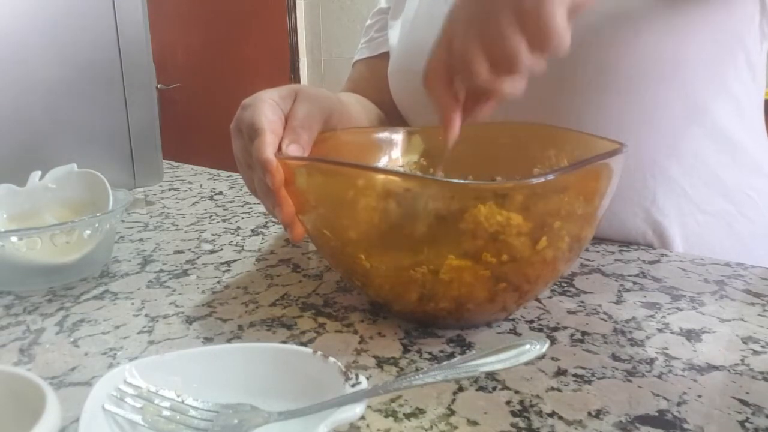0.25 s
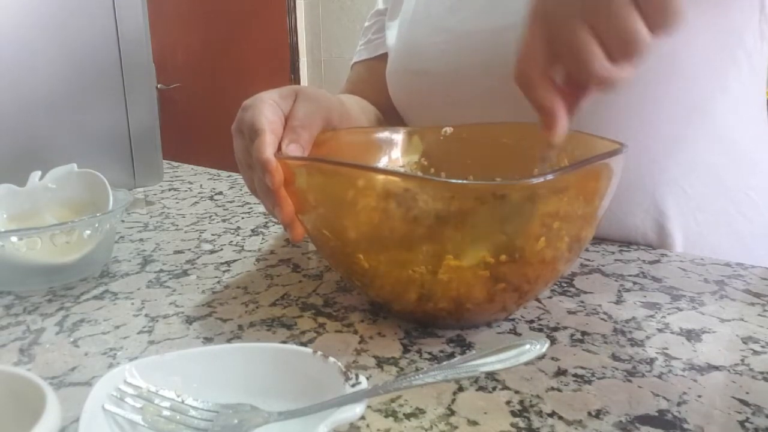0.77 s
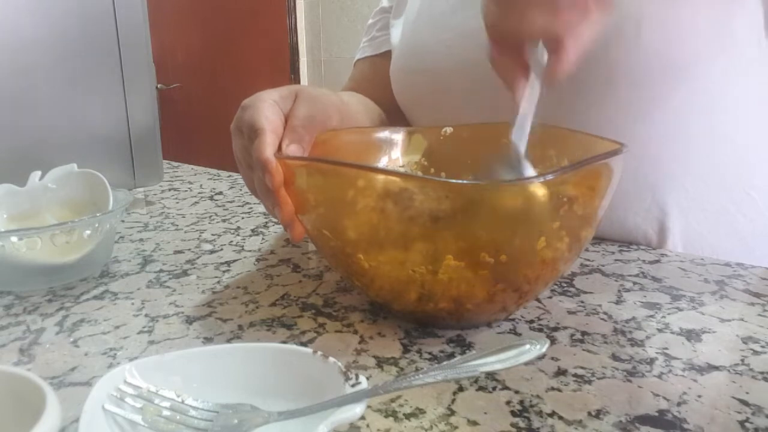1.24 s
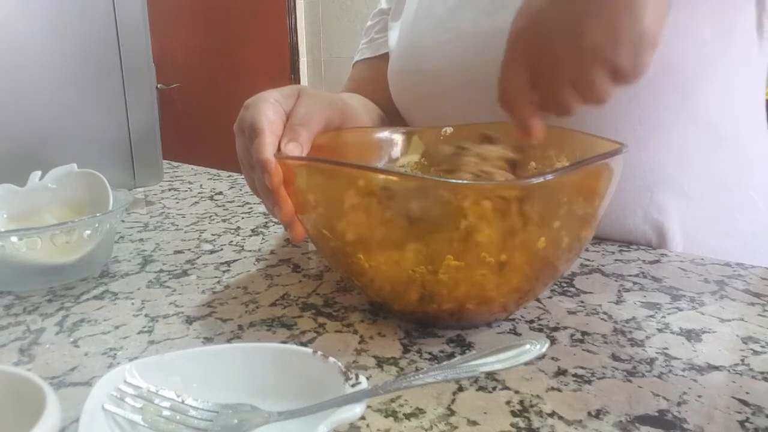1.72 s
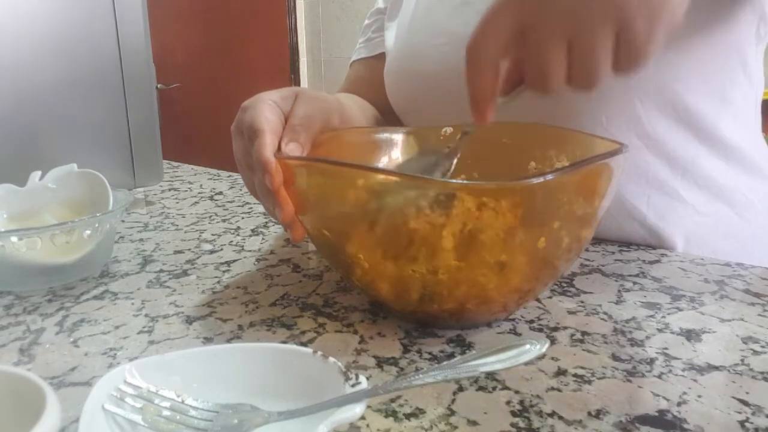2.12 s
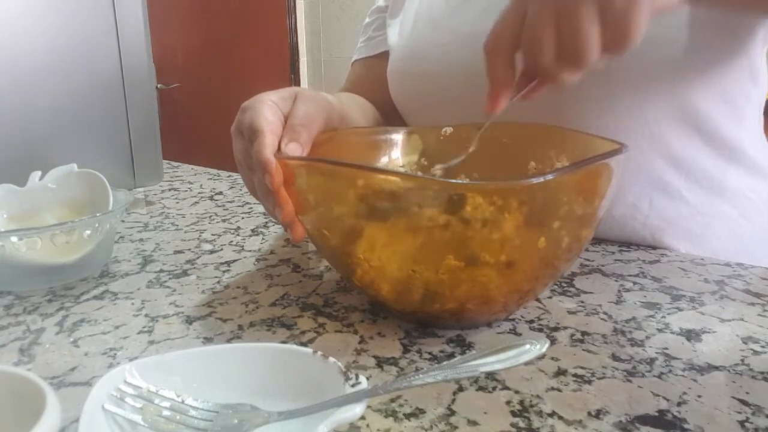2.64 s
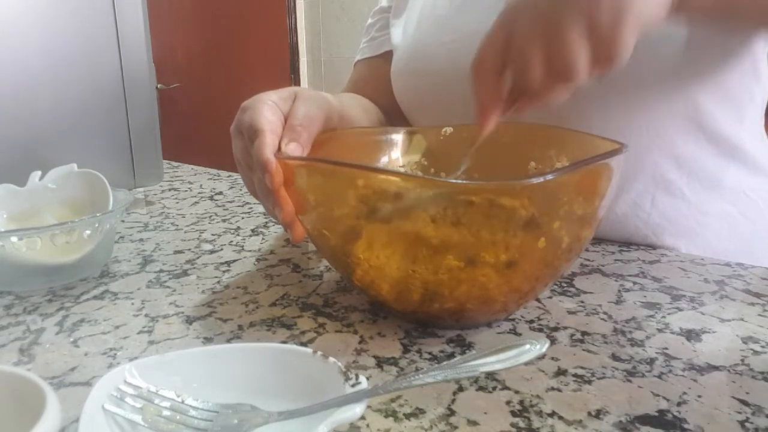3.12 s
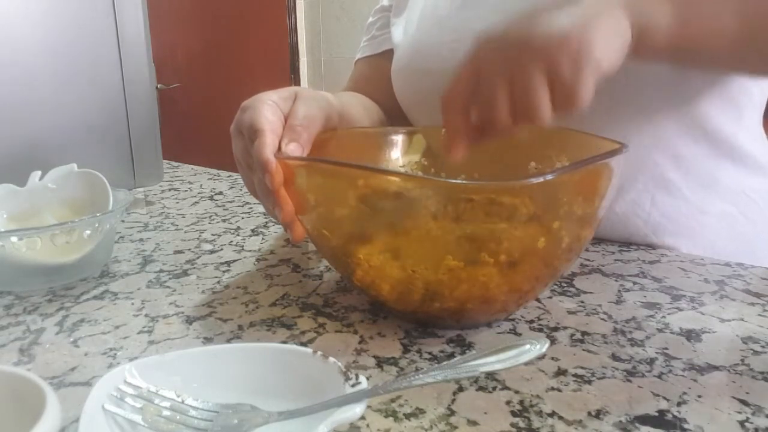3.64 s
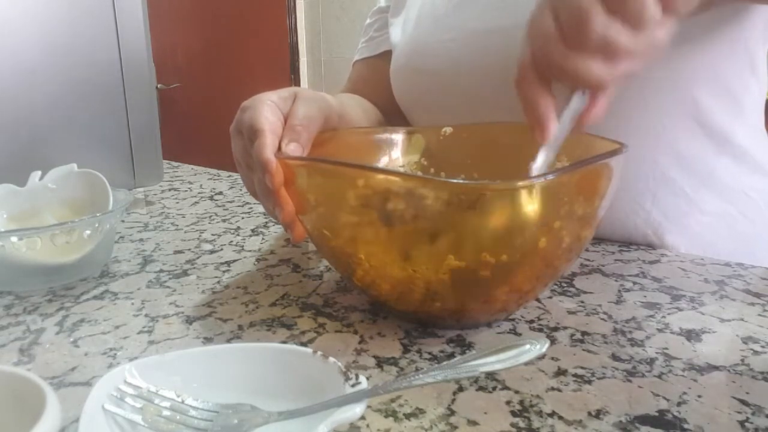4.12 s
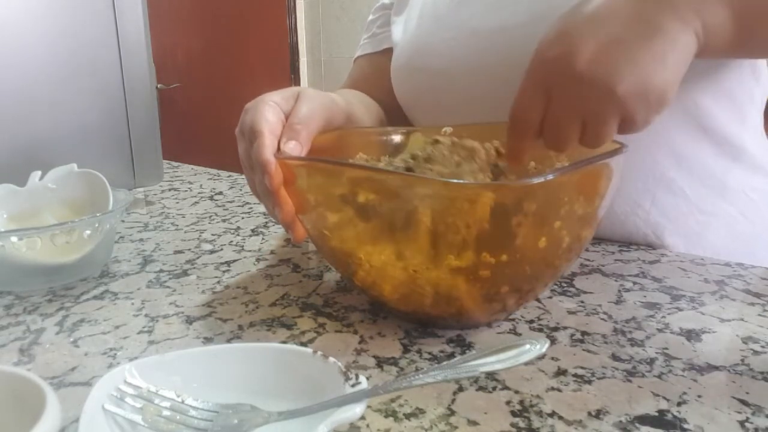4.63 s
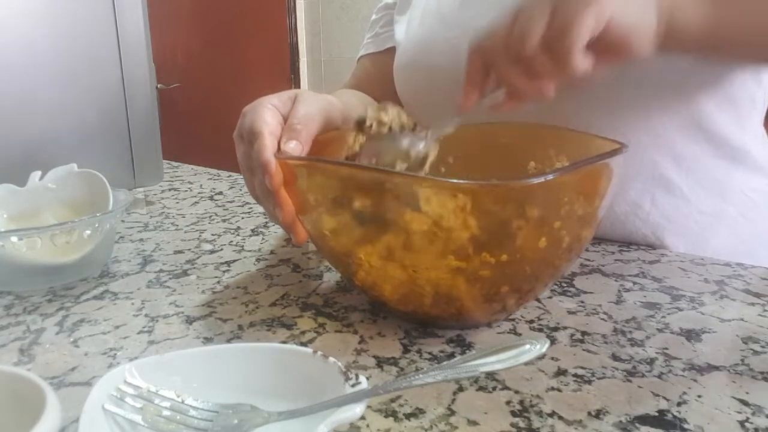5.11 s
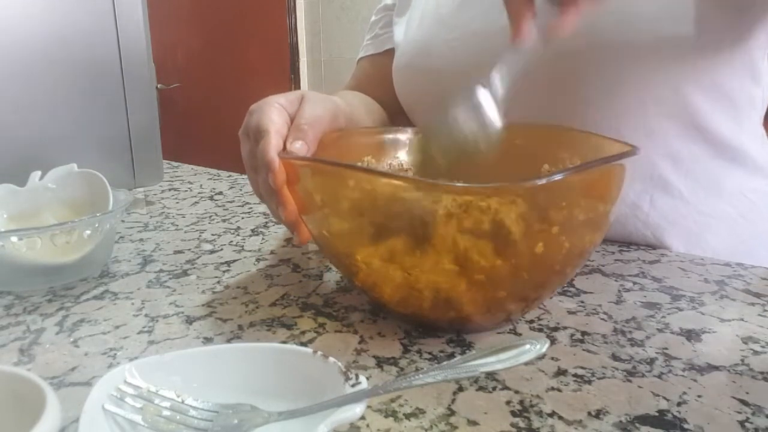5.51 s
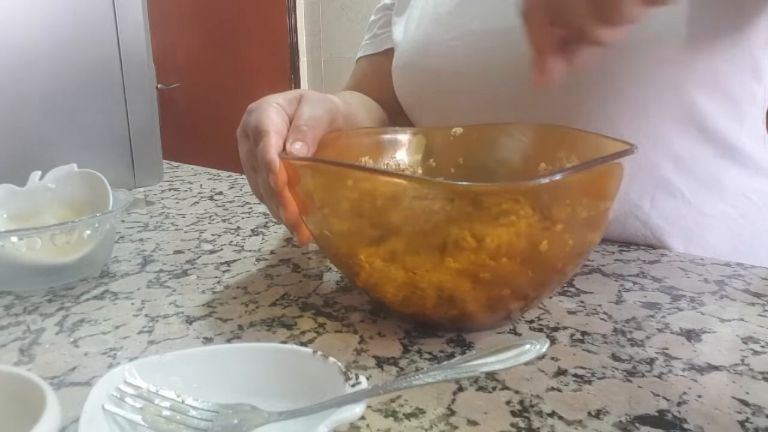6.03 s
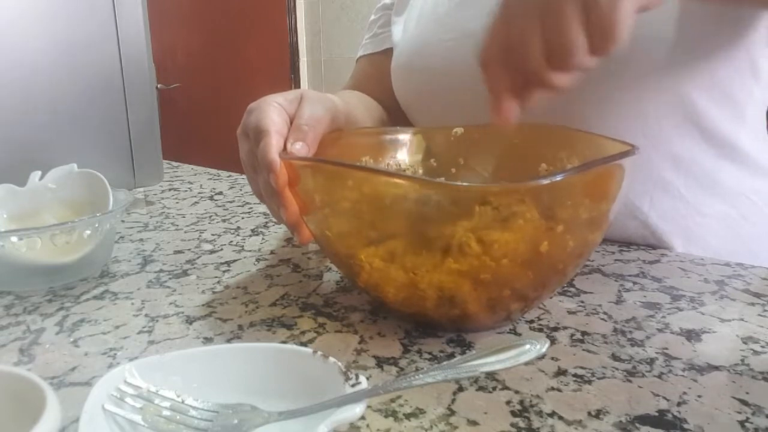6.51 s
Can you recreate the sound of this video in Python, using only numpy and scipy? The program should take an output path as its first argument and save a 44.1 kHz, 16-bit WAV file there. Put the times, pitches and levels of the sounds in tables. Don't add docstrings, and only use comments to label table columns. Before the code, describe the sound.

In a small hard-walled kitchen with a low refrigerator hum, a glass bowl knocks on a stone counter right at the start. Quiet sticky smacks and faint squelches of thick dough follow, clearer around 1.0 s. At 1.3 s the bowl thumps twice and a spoon drags lightly and unevenly along the glass until about 1.9 s. Soft wet smacks continue from 2 to 3.2 s, then blunt thumps at 3.3 and 3.6 and a stronger, ringing knock at 3.85. A knock with a soft clink at 4.2 leads to a hard, jerky metallic scrape at 4.3, easing by 4.8 s. Dull dough smacks come near 5.4, then a calmer gap. Hard knocks at 6.1, 6.3 and 6.4 are loudest, with a bright glass clink at 6.3; another knock and firm clink land at 6.7. Spaced stereo microphones, brighter on the right, with short echoes.

```python
import sys
import numpy as np
from scipy import signal
from scipy.fft import rfft, irfft
from scipy.io import wavfile
from scipy.ndimage import uniform_filter1d

SR = 44100
rng = np.random.default_rng(int(sys.argv[2]) if len(sys.argv) > 2 else 0)


def unload_wav(signal):
    wavfile.write(
        sys.argv[1],
        SR,
        np.round(np.clip(np.atleast_2d(signal).T, -1, 1) * 32767).astype(np.int16),
    )


def ratio_of_db(decibels):
    return 10 ** (np.asarray(decibels, float) / 20)


N = 298071


def evened(x):
    return x / np.sqrt(np.mean(x ** 2) + 1e-20)


def peaked(x, lo_hz, hi_hz):
    band = signal.sosfilt(signal.butter(2, [lo_hz, hi_hz], "bandpass", fs=SR, output="sos"), x)
    return x / np.abs(band).max()


def read(points, hz):
    f, value = np.transpose(points)
    return np.interp(np.log(hz + 1), np.log(f + 1), value)


def filtered(x, points):
    return irfft(rfft(x) * ratio_of_db(read(points, np.fft.rfftfreq(N, 1 / SR))), N)


def add(mix, s, sound):
    part = mix[max(round(s * SR), 0):][:len(sound)]
    part += sound[:len(part)]


def unfold(rows):
    s, *columns = np.transpose(rows)
    t = np.arange(s[0], s[-1], 1 / SR)
    return s[0], signal.windows.tukey(len(t), 0.08), [np.interp(t, s, c) for c in columns]


def resonate(x, hz, width):
    turn = np.exp(2j * np.pi * np.cumsum(hz * np.ones(len(x))) / SR)
    r = np.exp(-np.pi * width / SR)
    return 2 * (turn * signal.lfilter([1 - r], [1, -r], x / turn + 1e-18)).real


def ring(modes, extra_db=0, longer=1, spread_db=0):
    hz, db, t60 = np.transpose(modes)[:, :, None]
    t = np.arange(SR // 3) / SR
    sign = (-1.) ** np.arange(len(hz))[:, None]
    level_db = db + extra_db + spread_db * rng.standard_normal(hz.shape) - 60 * t / np.abs(t60 * longer)
    swell = 1 - np.exp(-t / 0.0014)
    return swell * (sign * ratio_of_db(level_db) * np.sin(2 * np.pi * hz * t)).sum(0)


def blow(ms):
    u = np.arange(400) / (ms * SR / 1000)
    push = u * np.exp(-u)
    return push / np.sum(push)


def burst(size, t60):
    return rng.standard_normal(size) * ratio_of_db(-60 * np.arange(size) / SR / t60)


def grit(size, per_s, spread_db):
    sizes = ratio_of_db(spread_db * np.minimum(rng.exponential(1, size), 5)) * rng.standard_normal(size)
    return evened(sizes * (rng.random(size) < per_s / SR))


BOWL_HZ = [465, 755, 900, 955, 1130, 1275, 1515, 1735, 1785, 1880, 2030, 2140, 2462, 2490, 2630, 3040, 3508,
           3556, 3930, 4622, 5350, 5900, 6350, 7300, 8500, 10240, 11210]
BOWL_DB = [-31.5, -18.5, -19.5, -10.5, -19.5, -14, -9.5, -6.5, 5, -12, -9, -22, 0.8, -10, -14, -20.5, -3,
           -29.5, -12, -4.5, -14, -16.5, -28, -38, -31, -44, -34.5]
BOWL_T60 = [0.82, 0.17, 0.22, 0.12, 0.3, 0.12, 0.14, 0.099, 0.041, 0.137, 0.1, 0.018, 0.082, 0.34, 0.054,
            0.094, 0.05, 0.21, 0.044, 0.04, 0.039, 0.055, 0.14, 0.25, 0.049, 0.11, 0.1]
BOWL = list(zip(BOWL_HZ, BOWL_DB, BOWL_T60))
MAIN_HZ = 2462
WALL_HZ, WALL_OCTAVES = 1880, 0.1
RING_SHARE, RING_PER_DB = 0.44, 0.24
# (time [s], peak [dB], crack [dB], wall modes [dB], upper modes [dB per octave])
CLINKS = [
    (4.1888, -24, -0.5, -18, 9),
    (6.284, -9, -6.5, -1.2, .1),
    (6.726, -14, -9, 10, 1.5),
]


def clinks():
    out = np.zeros(N)
    octaves = np.log2(np.array(BOWL_HZ)[:, None] / MAIN_HZ)
    from_wall = (octaves - np.log2(WALL_HZ / MAIN_HZ)) / WALL_OCTAVES
    for s, db, crack_db, wall_db, high_db in CLINKS:
        place_db = high_db * np.maximum(octaves, 0) + wall_db * np.exp(-from_wall ** 2)
        glass = ring(BOWL, place_db, longer=RING_SHARE * ratio_of_db(RING_PER_DB * db))
        glass = peaked(glass, 2200, 3000)
        crack = np.convolve(burst(len(glass), 0.1), blow(0.03))[:len(glass)]
        add(out, s, ratio_of_db(db - 3.5) * (glass + ratio_of_db(crack_db - 1.0) * crack))
    return out


MIDDLE_HZ, TIP_HZ = 2586, 4920
HISS_DB, HISS_FOLLOW, HISS_FADE_DB_PER_S = -70, 0.31, 29
# (time [s], pressure [dB], lowest spoon resonance [Hz], top spoon resonance [Hz])
SCRAPES = [
    [(1.335, -78, 1680, 3980), (1.387, -62, 1590, 3500), (1.509, -58.5, 1560, 3820),
     (1.62, -57, 1850, 4000), (1.725, -58.5, 2190, 3940), (1.775, -60, 1870, 3800),
     (1.863, -61, 1700, 3740), (1.98, -79, 1700, 4100)],
    [(4.325, -72.5, 1940, 3800), (4.361, -41.5, 1820, 3700), (4.441, -40, 1820, 3650),
     (4.513, -43.5, 1765, 3640), (4.553, -53.5, 1560, 3950), (4.623, -56.5, 1654, 3870),
     (4.695, -53.5, 1530, 3900), (4.8, -81, 1600, 3800)],
]
# (time [s], first resonance peak [dB], second [dB re first], third [dB re first])
JERKS = [(1.3383, -25.5, 6, 3), (1.3411, -36, 2, 21.5), (1.3808, -34, 1.5, 8.5), (1.4238, -36.5, -18, -5),
         (1.465, -44, 4, 9.5), (1.5139, -32, -2.5, 5), (1.541, -34.5, -30, -15.5), (1.5618, -42.5, -13, 9),
         (1.598, -36.5, -4, 1.5), (1.631, -42, -2, -13), (1.7882, -35, 8, -25), (1.8048, -28, -17, -10),
         (1.828, -31, -15, -6), (1.8751, -49, 9, 7.5), (1.9293, -54, 14.5, 9), (1.9424, -57, 6, 20.5),
         (4.3288, -12.5, 6.5, -6), (4.3407, -28, -8, 1.5), (4.369, -30, -8, -25), (4.3994, -26, -27, -23),
         (4.419, -26, -20, -2), (4.442, -22, -3, -12), (4.4615, -19, -8, -15), (4.4817, -22, -10, -10),
         (4.496, -32.5, -27, -30), (4.5154, -23.5, -11, -15), (4.6184, -21.5, -10, -10),
         (4.6246, -30.5, -13, 8)]


def catches(start, size):
    lanes = np.zeros((4, size))
    for s, peak_db, second_db, third_db in JERKS:
        jerk = burst(400, 0.009)
        if start < s < start + size / SR:
            for lane, lane_db in zip(lanes, [0, second_db, third_db, third_db - 2.0]):
                add(lane, s - start, ratio_of_db(peak_db + lane_db) * jerk / np.linalg.norm(jerk))
    return lanes


def scrape(rows):
    start, window, (db, low_hz, top_hz) = unfold(rows)
    size = len(db)
    hiss_db = HISS_DB + HISS_FOLLOW * (db + 39) - HISS_FADE_DB_PER_S * np.arange(size) / SR
    clumps = evened(uniform_filter1d(rng.standard_normal(size), 300))
    slips = evened(ratio_of_db(3.2 * clumps) * grit(size, per_s=2700, spread_db=-3.0))
    jerks = catches(start, size)
    hiss = ratio_of_db(hiss_db) * evened(resonate(slips, 4000, 4300))
    tick = ratio_of_db(-1.5) * resonate(jerks[3], 4300, 12000)
    glass = ratio_of_db(db - 10) * evened(signal.oaconvolve(slips, ring(BOWL, longer=0.15))[:size])
    bowl_air = ratio_of_db(db - 6.0) * evened(resonate(resonate(slips, 710, 380), 1300, 1300))
    out = hiss + tick + glass + bowl_air
    pitches_hz = [low_hz, MIDDLE_HZ, top_hz, TIP_HZ]
    widths_shares = [(188, -1), (380, -7), (330, -4.5), (820, -22.5)]  # (width [Hz], share [dB])
    for hz, lane, (width, share_db) in zip(pitches_hz, jerks, widths_shares):
        ringing = ratio_of_db(db + share_db) * evened(resonate(slips, hz, width))
        ringing += resonate(lane, hz, width) * SR / (2 * np.pi * width)
        out += resonate(ringing, hz, 5 * width)
    return start, out * np.minimum(3 * window, 1)


SMACK_S, SHORTER_PER_DB = 0.015, 0.62
# (time [s], dull part peak [dB], bright part [dB re dull])
SMACKS = [(0.161, -47, 4), (0.184, -56.5, 18), (0.83, -54, 6), (0.917, -49, -5), (1.0209, -39.5, -0.5),
          (1.055, -52, 11), (1.096, -50.5, 14.5), (1.972, -45, 2), (2.022, -41.5, -6), (2.406, -49.5, 5),
          (2.438, -43.5, -15), (2.56, -45.5, -16), (2.6286, -56, 7), (2.867, -46.5, -15),
          (2.8944, -49.5, 6), (2.969, -52.5, 9), (3.018, -51, 11), (3.2655, -42.5, -11), (3.391, -47, -0.5),
          (3.7327, -38.5, -11), (3.945, -48, 10), (3.979, -49.5, 10), (4.9154, -44.5, 13), (4.9954, -45, 6),
          (5.3531, -40.5, -22), (5.399, -40.5, -18), (5.4484, -47, 1), (5.516, -49, -2), (6.05, -48, 10),
          (6.5534, -47, 8)]


def smacks():
    out, t = np.zeros(N), np.arange(SR // 6) / SR
    for s, db, bright_db in SMACKS:
        length_s = SMACK_S * ratio_of_db(-SHORTER_PER_DB * bright_db)
        pops = grit(len(t), per_s=7000, spread_db=3.5)
        dull = evened(resonate(resonate(pops, 2500, 2500), 2500, 2500))
        bright = evened(resonate(resonate(pops, 5200, 3000), 5200, 3000))
        fizz = evened(np.diff(pops, prepend=0))
        wet = dull + ratio_of_db(bright_db) * bright + ratio_of_db(bright_db - 2.5) * fizz
        shape = np.minimum(t / 0.00091, 1) * ratio_of_db(-20 * t / length_s)
        add(out, s, ratio_of_db(db - 15.5) * wet * shape)
    return out


# (pitch [Hz], strength [dB], ring time [t60 s])
COUNTER = [(45, -14, .25), (104, -1, .2), (160, -10, .3), (258, -7, .22), (310, -8, .1), (400, -2, .15),
           (465, -8, .1), (555, -6, .12), (710, -5, .1), (800, -8, .1), (960, -6, .12), (1125, -8, .15),
           (1275, -10, .15)]
CLATTER_DB, CLATTER_DB_PER_MS = -16, -62.5
# (time [s], peak [dB], contact [ms], glass ringing along [dB], cupboard boom [dB])
KNOCKS = [(0.001, -17.5, 0.14, -11, 1), (0.441, -43, 0.17, 4, 6.5), (1.3371, -26.5, 0.083, -13, -1),
          (1.383, -29.5, 0.11, -25, 3.5), (2.084, -41.5, 0.083, -1, 5.5), (3.319, -26, 0.44, -0.5, -10),
          (3.572, -24.5, 0.34, 0, -6), (3.84, -14.5, 0.19, 9.5, 1), (4.188, -20.5, 0.17, -8, 1.5),
          (4.329, -24, 0.029, -15, 10.5), (4.619, -26.5, 0.045, -22, 7.5), (4.826, -39.5, 0.038, -17, -47),
          (5.402, -42.5, 0.15, -6, 1), (6.127, -14, 0.18, -2, -1.5), (6.2839, -16.5, 0.056, 6, 4.5),
          (6.399, -8, 0.08, -4, -1.5), (6.725, -21, 0.21, -16, 2.5)]


def knocks():
    out = np.zeros(N)
    deep = np.transpose(COUNTER)[0][:, None] < 200
    for s, db, ms, glass_db, boom_db in KNOCKS:
        body = ring(COUNTER, boom_db * deep, spread_db=1.5) + ring(BOWL, glass_db, 0.4, spread_db=1.5)
        body += 14.7 * burst(len(body), 0.027)
        body -= ring([(454, 28.7, 0.0084)]) + ring([(1087, 28, 0.0083)]) + ring([(1964, 20.7, 0.011)])
        thud = peaked(np.convolve(body, np.convolve(blow(ms), blow(0.03))), 150, 900)
        tick = np.diff(burst(len(body), 0.006), prepend=0)
        clatter = np.convolve(burst(len(thud), 0.0066), blow(0.035))[:len(thud)]
        add(clatter, 0, ratio_of_db(-4.5) * tick)
        clatter_db = CLATTER_DB + CLATTER_DB_PER_MS * ms
        add(out, s, ratio_of_db(db - 7.0) * (thud + ratio_of_db(clatter_db) * clatter))
    return out


PUSH_DB_PER_S, LET_GO_DB_PER_S = 204, 119.5
# (middle [s], length [s], squelch [dB], bowl rocking on the counter [dB])
STIRS = [(.16, 0.02, -64, -48), (.47, .12, -72.5, -62.5), (.66, 0.095, -89, -61), (.9, 0.19, -72.5, -61.5),
         (1.046, 0.02, -61.5, -75), (1.5, 0.12, -51.5, -54.5), (1.64, 0.16, -57.5, -48.5),
         (1.83, 0.092, -58, -55.5), (1.95, 0.2, -63.5, -60), (2.11, 0.072, -74, -55.5),
         (2.436, 0.026, -66, -58), (2.63, 0.034, -74.5, -59.5), (2.9, 0.18, -69, -60.5),
         (3.06, 0.049, -80, -57.5), (3.25, 0.05, -74, -59.5), (3.5, 0.099, -70.5, -61),
         (3.76, .1, -69, -55.5), (3.99, 0.099, -74.5, -55.5), (4.42, 0.074, -47, -43),
         (4.55, 0.049, -53, -50.5), (4.69, 0.022, -56.5, -50), (4.84, .14, -68, -60),
         (4.96, 0.048, -64, -60), (5.361, 0.064, -63, -46.5), (5.6, 0.12, -78.5, -69),
         (5.88, .16, -72, -69.5), (6.07, 0.2, -71.5, -70.5), (6.56, 0.036, -76, -51)]


def stirring():
    middle, length, squelch_db, rock_db = np.transpose(STIRS)[:, :, None]
    t = np.arange(0, N + 64, 64) / SR
    before = np.maximum(middle - length / 2 - t, 0)
    after = np.maximum(t - middle - length / 2, 0)
    push_db = -PUSH_DB_PER_S * before - LET_GO_DB_PER_S * after
    wet, tilt = (np.interp(np.arange(N) / SR, t, ratio_of_db(db + push_db).max(0)) for db in (squelch_db, rock_db))
    pops = grit(N, per_s=7200, spread_db=2.5)
    squelch = evened(resonate(resonate(pops, 3300, 2300), 4000, 3417))
    lumps = uniform_filter1d(grit(N, per_s=1200, spread_db=1.8), 70)
    rock = evened(signal.oaconvolve(lumps, ring(COUNTER, longer=0.45))[:N])
    return ratio_of_db(-6.0) * wet * squelch, ratio_of_db(-9.5) * tilt * rock


# (frequency [Hz], likeness [0 to 1])
SAME = [(60, 0.78), (290, 1), (500, 0.2), (900, 0.067), (16000, 0.0089)]


def diffuse(z):
    same = np.clip(read(SAME, np.linspace(0, SR / 2, z.shape[1])), 0, 1)[:, None]
    return np.array([same * z[1] + np.sqrt(1 - same ** 2) * z[0], z[1]])


# (frequency [Hz], decay [t60 s])
KITCHEN = [(60, 0.046), (250, 0.28), (1000, 0.33), (3000, 0.3), (8000, 0.28), (16000, 0.3)]


def kitchen(x):
    out, t = np.zeros((2, N)), np.arange(N) / SR
    for k in range(3):
        taps = np.zeros((2, SR))
        at = np.arange(120, SR - 20, 20) + rng.integers(0, 20, (2, (SR - 121) // 20))
        np.put_along_axis(taps, at, rng.choice([-1., 1.], at.shape), 1)
        hz, late, z = signal.stft(taps, SR, nperseg=512)
        decay = ratio_of_db(-60 * late / read(KITCHEN, hz)[:, None])
        tail = signal.istft(diffuse(z) * decay, SR, nperseg=512)[1]
        turn = np.sqrt(2 / 3) * np.cos(2 * np.pi * (1.7 * t + k / 3))
        out += signal.fftconvolve((x * turn)[None], tail / np.linalg.norm(tail[0]), axes=1)[:, :N]
    return out


# (frequency [Hz], level [dB per Hz])
AIR = [(15, -48.5), (25, 4), (49, -16), (170, -9.5), (229, -12.5), (394, -8), (545, -14), (1040, -15),
       (1440, -23), (1740, -20), (7110, -40), (14800, -38), (16000, -43)]
AIR_DB = -66.5
# (pitch [Hz], width [Hz], level [dB])
FRIDGE = [
    (403.6, 8.4, -68),
    (384.4, 12, -69),
    (1047, 15, -87.5),
]


def air():
    frames, hz = N // 256 + 5, np.fft.rfftfreq(1024, 1 / SR)
    a, b, c, d, patches = rng.standard_normal((frames, 513, 5)).T
    patches = evened(uniform_filter1d(uniform_filter1d(patches, 12, 0), 14, 1))
    z = diffuse(np.array([a + 1j * b, c + 1j * d])) * ratio_of_db(read(AIR, hz)[:, None] + 0.4 * patches)
    out = ratio_of_db(AIR_DB) * evened(signal.istft(z, nperseg=1024, noverlap=768)[1][:, :N])
    for f, width, db in FRIDGE:
        line = resonate(resonate(rng.standard_normal(N), f, width), f, 2 * width)
        out = out + ratio_of_db(db) * evened(line)
    return out


def delayed(x, s):
    return np.interp(np.arange(N) - s * SR, np.arange(N), x)


LAG_S = 0.00034
INSIDE_LAG_S = 0.00005
# (frequency [Hz], gain [dB])
SHADE = [(300, 4), (1500, 1), (3000, -5), (6000, -17.5), (14000, -3)]


def scene():
    rim, inside, counter = clinks(), smacks(), knocks()
    for rows in SCRAPES:
        add(inside, *scrape(rows))
    squelch, rock = stirring()
    inside, counter = inside + squelch, counter + rock
    left = filtered(delayed(rim, LAG_S) + delayed(inside, INSIDE_LAG_S), SHADE)
    direct = np.array([left, rim + inside]) + counter
    echo = kitchen(ratio_of_db(-3.5) * rim + ratio_of_db(-4.5) * inside + ratio_of_db(-0.5) * counter)
    bass_cut = signal.butter(4, 90, "highpass", fs=SR, output="sos")
    return signal.sosfilt(bass_cut, direct + echo) + air()


def roll_off(x):
    return signal.sosfilt(signal.butter(12, 16510, fs=SR, output="sos"), x)


# (frequency [Hz], gain [dB])
LEFT = [(60, -1.0), (130, -2.0), (290, -5.0), (640, -4.0), (1410, -2.5), (3100, -4.5), (6820, -7.0),
        (15000, -4.0)]


def record(dry):
    shaded = np.array([filtered(dry[0], LEFT), dry[1]])
    mix = ratio_of_db(4.5) * filtered(shaded, [(15500, 1), (16300, -26.0)])
    return roll_off(np.clip(mix, -1, 1))


dry = scene()
out = record(dry)
unload_wav(out)
```